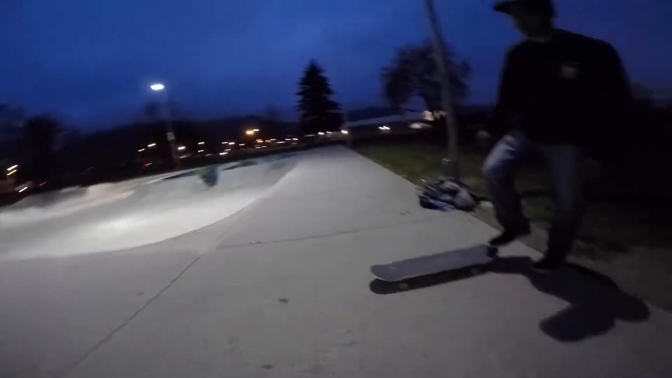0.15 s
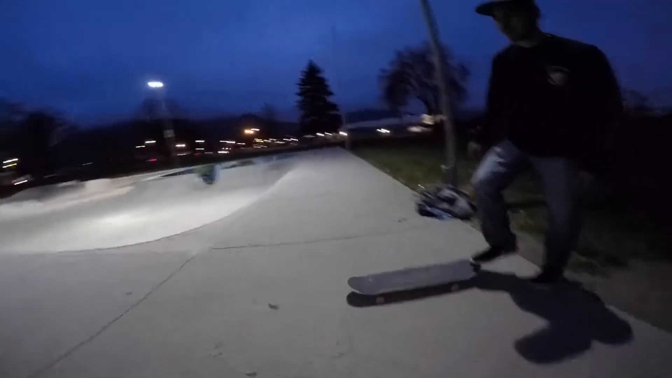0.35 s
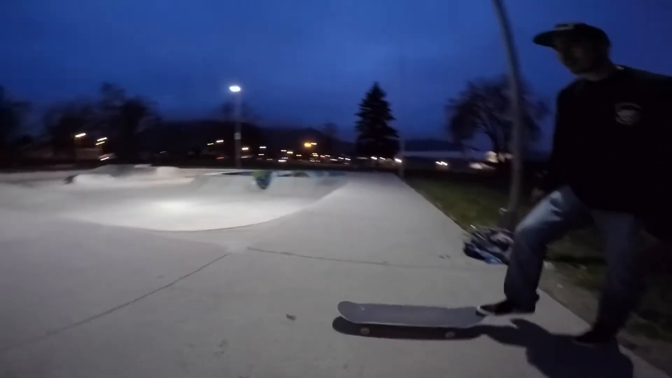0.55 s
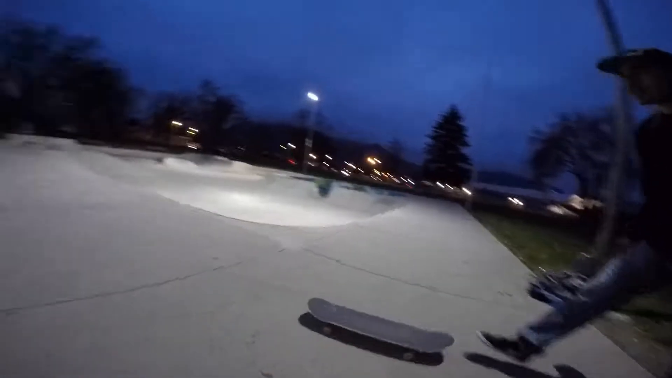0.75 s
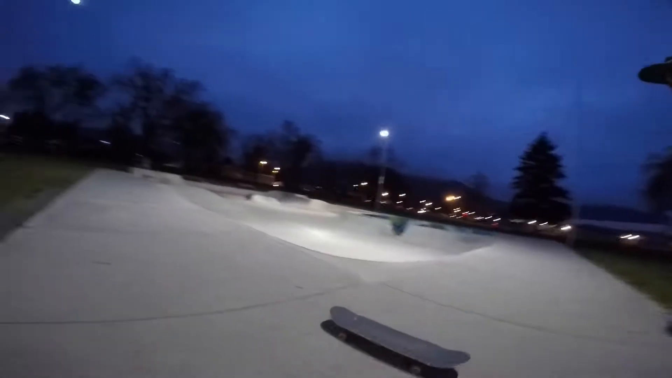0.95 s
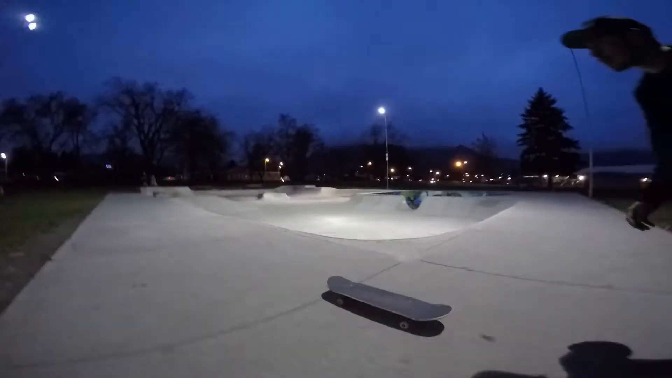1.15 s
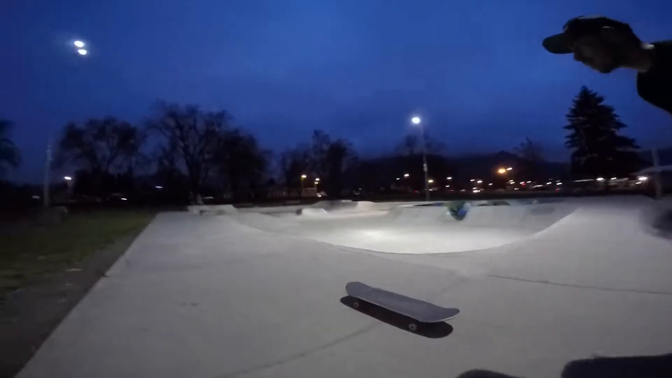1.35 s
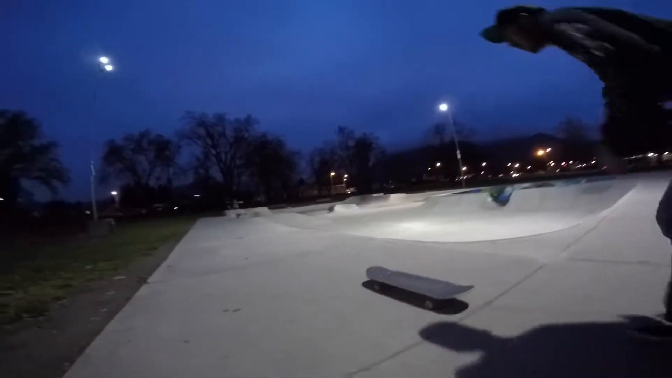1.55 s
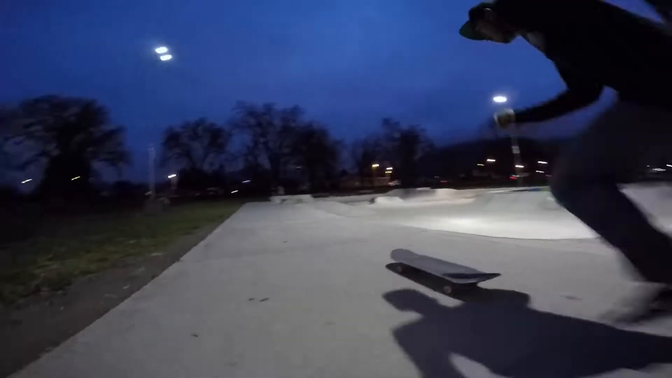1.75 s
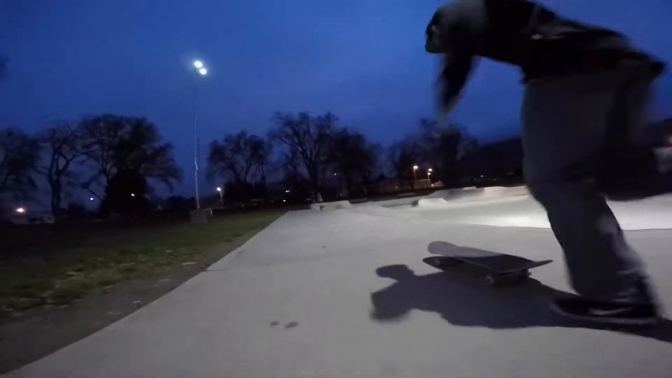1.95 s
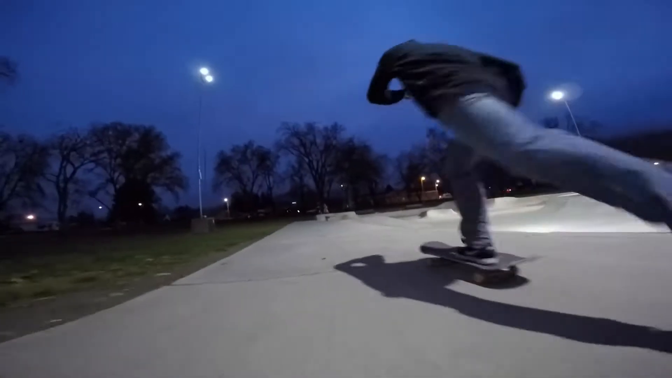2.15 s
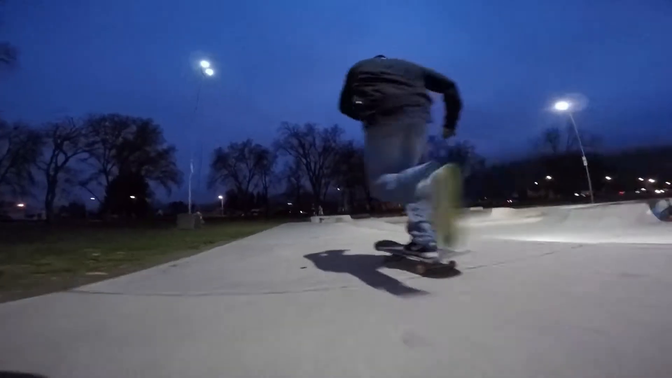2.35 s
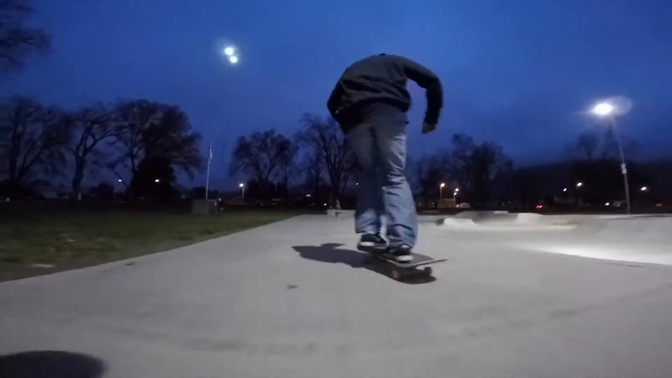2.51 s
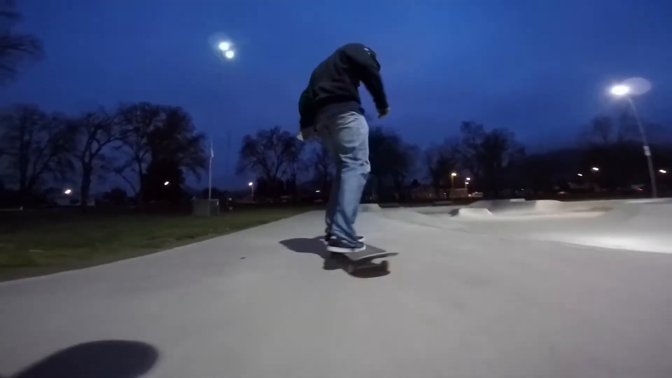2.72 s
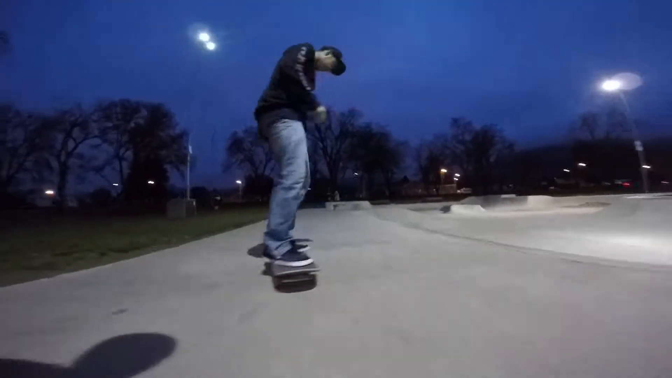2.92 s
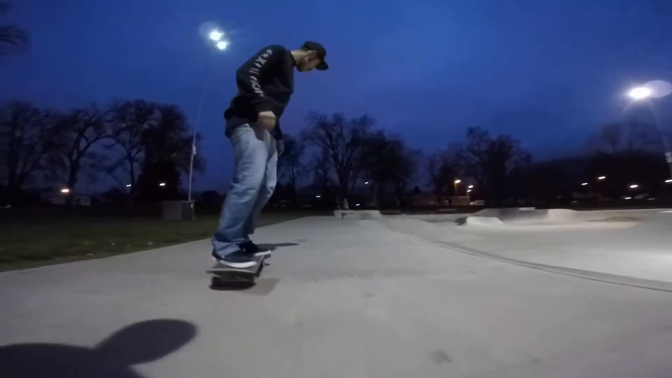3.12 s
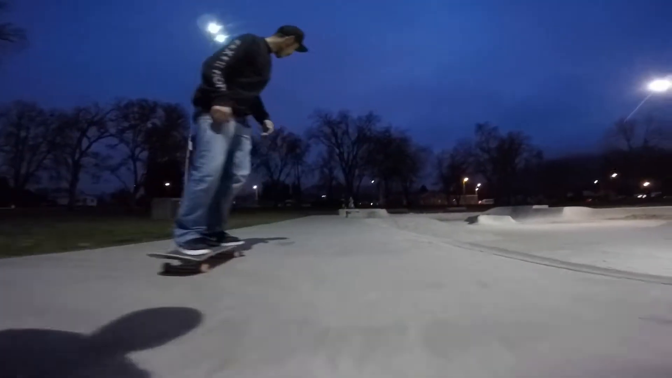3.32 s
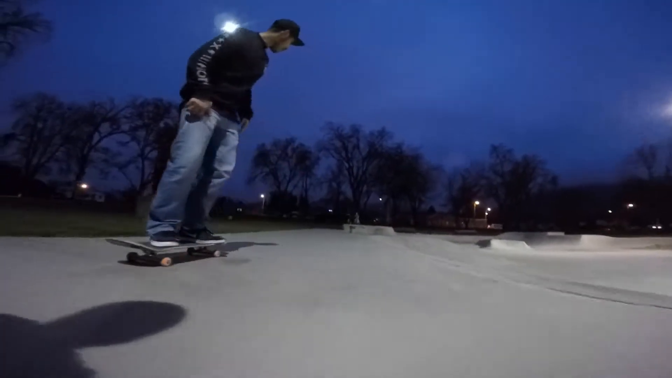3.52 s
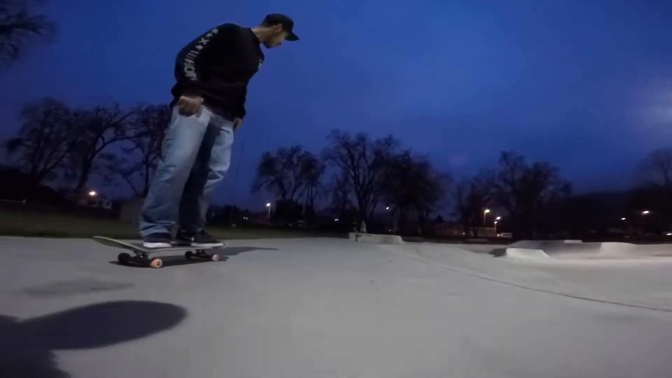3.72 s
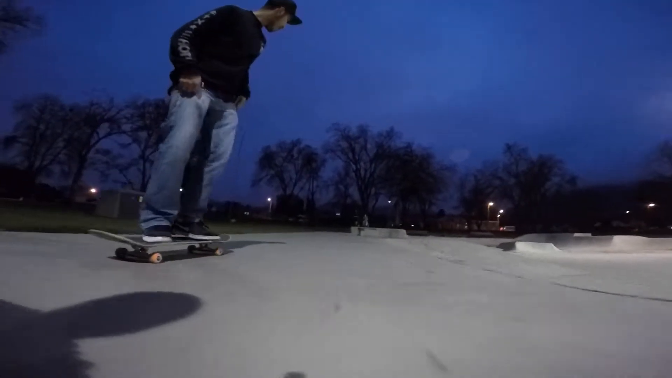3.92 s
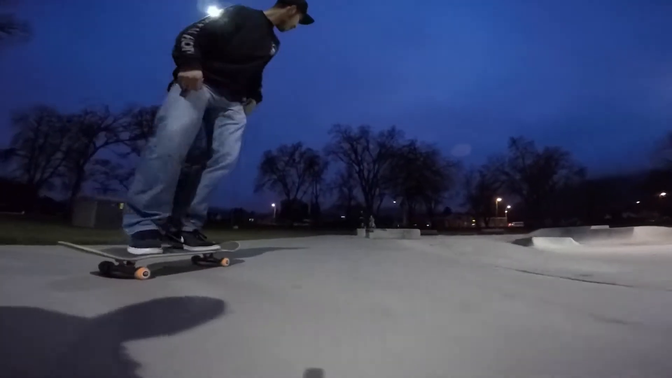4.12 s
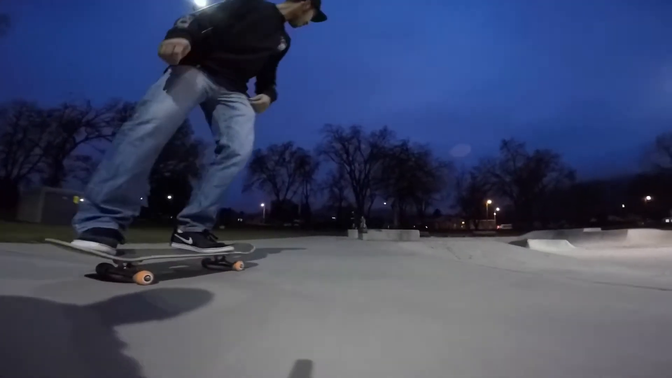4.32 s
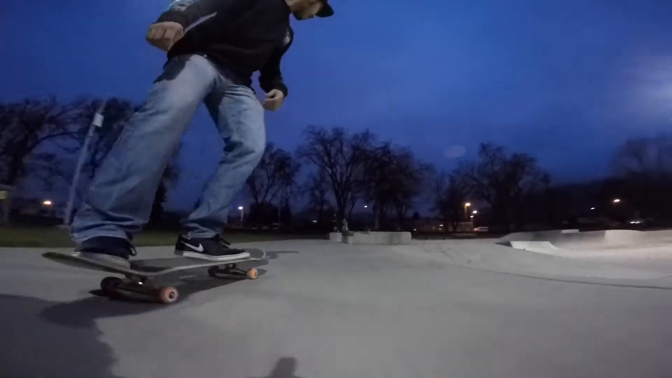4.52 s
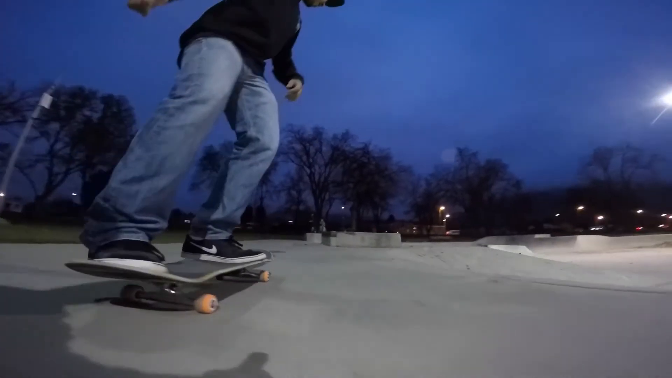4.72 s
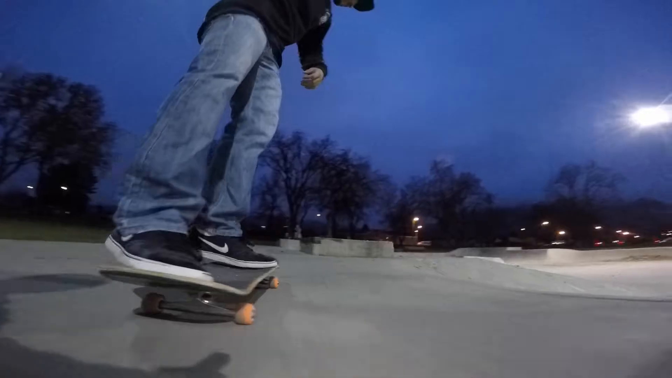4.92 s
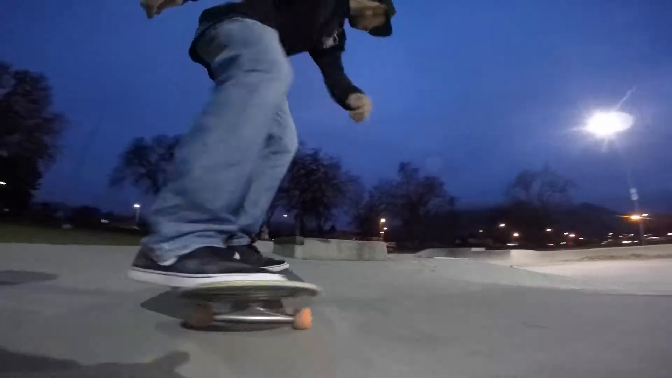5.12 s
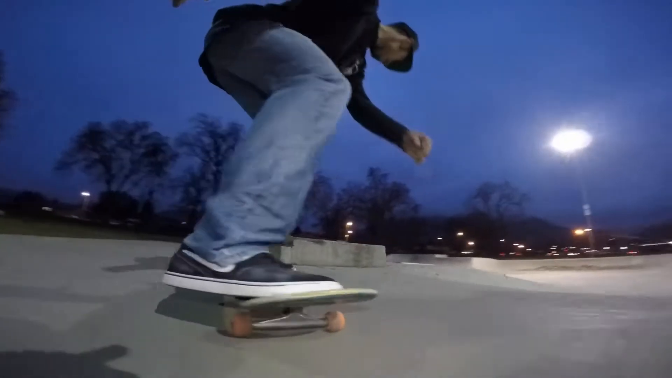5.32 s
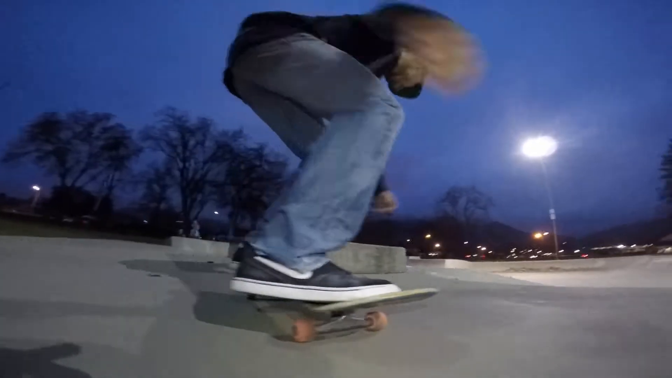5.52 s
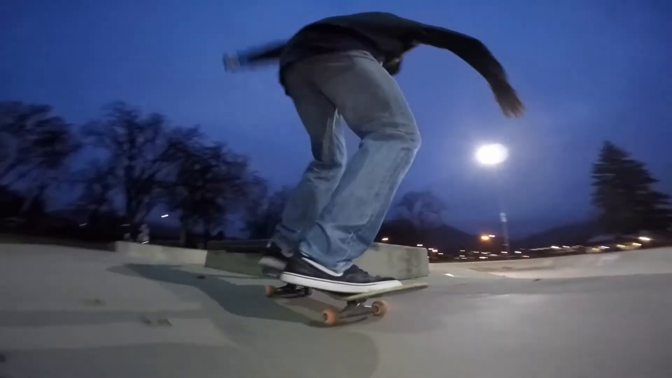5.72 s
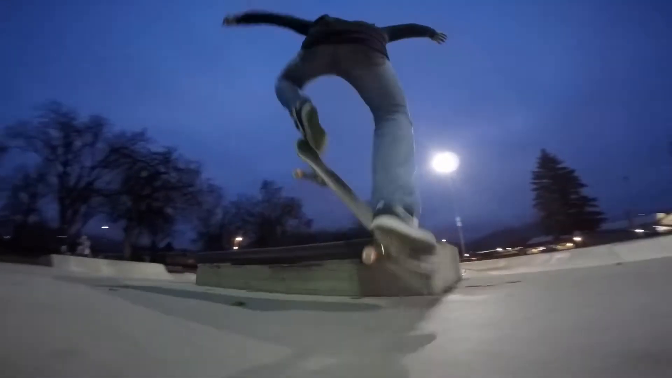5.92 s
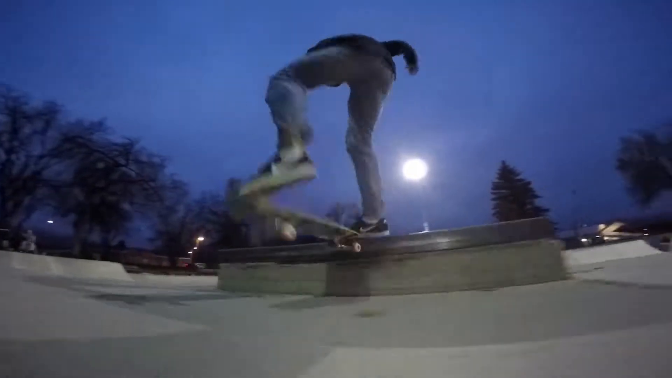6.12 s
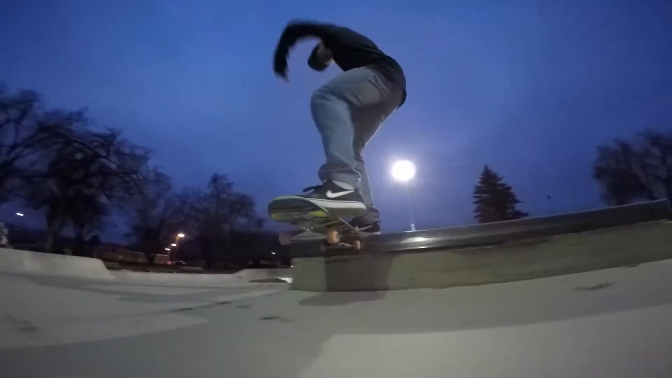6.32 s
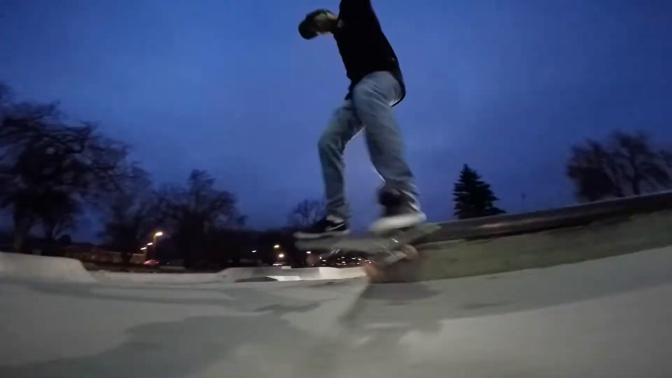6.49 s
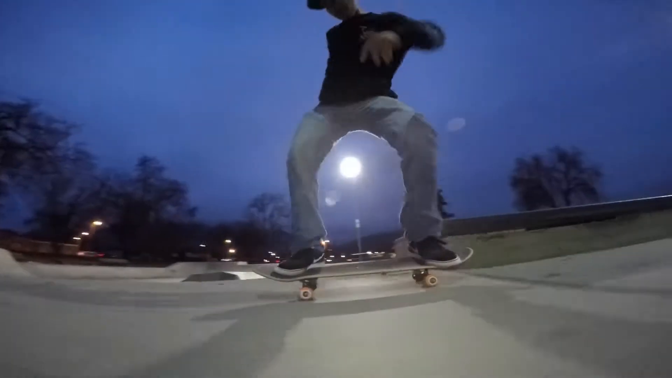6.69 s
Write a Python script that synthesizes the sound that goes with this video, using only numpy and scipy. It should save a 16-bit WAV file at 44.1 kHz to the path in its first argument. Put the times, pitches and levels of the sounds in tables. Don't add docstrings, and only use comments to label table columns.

```python
import sys
import numpy as np
from scipy import signal
from scipy.fft import rfft, irfft, next_fast_len
from scipy.io import wavfile
from scipy.ndimage import uniform_filter1d, map_coordinates

SR = 44100
rng = np.random.default_rng(int(sys.argv[2]) if len(sys.argv) > 2 else 0)


def gain_from_decibels(decibels):
    exponent = np.asarray(decibels, float) / 20
    return 10 ** exponent


def unload_audio(sound):
    columns = np.transpose(np.atleast_2d(sound))
    steps = np.round(np.clip(columns, -1, 1) * 32767)
    wavfile.write(sys.argv[1], SR, steps.astype(np.int16))


N = 297675
STILL_S = 0.27

# (centre [Hz], width [Hz], level [dB])
AXLES = [(3840, 300, 8), (4940, 1700, 0), (6400, 500, 3)]


def unit(x):
    return x / np.sqrt(np.mean(x ** 2) + 1e-20)


def along(points, hz):
    f, v = np.transpose(points)
    return np.interp(np.log(hz + 1), np.log(f + 1), v)


def curves(rows):
    s, *cols = np.transpose(rows)
    return [np.interp(np.arange(N) / SR, s, c) for c in cols]


def wobble(rate):
    knots = rng.standard_normal(int(N * rate / SR) + 4)
    return map_coordinates(knots, [np.arange(N) * rate / SR])


def filtered(x, response):
    m = next_fast_len(N + SR // 2)
    gain = response(np.fft.rfftfreq(m, 1 / SR))
    gain = gain / np.sqrt(np.mean(np.abs(gain) ** 2))
    return irfft(rfft(x, m) * gain, m)[:N]


def modes(x, table):
    def response(f):
        total = 0
        for k, (centre, width, db) in enumerate(table):
            damping = 1j * f * width
            total = total + (-1) ** k * gain_from_decibels(db) * damping / (centre ** 2 - f ** 2 + damping)
        return total
    return filtered(x, response)


def coloured(x, spectrum):
    return filtered(x, lambda hz: gain_from_decibels(along(spectrum, hz)))


def contacts():
    # (time [s], clack [dB], deck thud [dB], length [s])
    empty_strikes = [(.0257, 1, 2, 0.0013), (.030, -10.5, 6.5, 0.0022), (0.049, -24.5, -15, 0.0098),
                     (0.057, -21.5, 9, 0.0037), (.0783, -29, -7, 0.0047), (.1222, -25, 9, 0.0052),
                     (0.164, -24, 9, 0.0049), (0.1764, -28, -15, 0.0042), (0.192, -27.5, -15, 0.0078),
                     (0.211, -32.5, 6, 0.0061), (.2315, -43, 9, 0.0011), (0.262, -31, -11, 0.0084),
                     (0.517, -47, -2, 0.0019), (0.55, -44.5, -6, .0063), (.575, -42, -1, .003),
                     (.6079, -45, 13, 0.0081), (0.719, -31, -10, 0.0033), (0.741, -21, 7, 0.0048),
                     (0.773, -26.5, -16, 0.0044), (0.9254, -32, 3, 0.016), (1.0546, -25.5, -14, 0.0084),
                     (1.226, -25.5, -19, 0.0025), (1.297, -20, 0.5, 0.0095), (1.337, -25, 2, 0.005),
                     (1.526, -22, 1.5, 0.0078), (1.588, -26.5, -20, 0.0051), (1.623, -18.5, -1, 0.0016),
                     (1.8563, -30, -7, 0.0082), (1.9002, -26, -12, 0.0043), (1.9694, -23, 8, 0.0032),
                     (2.027, -30.5, -11, 0.013)]
    # (time [s], clack [dB], deck thud [dB], metal tick [dB], length [s])
    pebbles = [(0.64, -44, -14, 2, .002), (.66, -48, -9, 0, .002), (.805, -34, -6, 4, .002),
               (0.934, -34, -9, 4, .002), (.99, -36, -9, 2, 0.0022), (1.008, -32, -13, 5, .002),
               (1.36, -26, -9, -10, .003), (1.465, -26, -9, -9, 0.0016), (1.481, -35, -9, 1, .002),
               (1.561, -26, -7, -6, .003), (1.874, -33, -9, -4, .002), (2.051, -35, -9, 1, .002)]
    trick = [(2.168, -24.5, -2, 1, 0.006), (2.174, -21, -11, 0.5, 0.012), (5.8801, 0, -7, -7.5, 0.002),
             (5.883, -2, -11, -11, 0.0021), (5.928, -37, 6, -12, 0.019), (6.0825, -21.5, 1, -17, 0.0097),
             (6.1646, -4, -2.5, -4.5, 0.0035), (6.205, -26, 7.5, -17, 0.0086),
             (6.226, -24.5, 8, -15, 0.0038), (6.271, -30.5, 4.5, -15, 0.0053), (6.59, -38, 14, -2, 0.0013),
             (6.601, -15.5, 2.5, -28, 0.0052), (6.616, -23, 1, -13, 0.013),
             (6.626, -25, -33, -13.5, 0.0066), (6.6374, -13, -8, -9, 0.0041),
             (6.6508, -25.5, 16.5, -3, 0.0029), (6.659, -30, -3, -3, 0.0054),
             (6.6863, -17.5, -7.5, -8.5, 0.0048), (6.7, -17.5, -10, -15, 0.0035),
             (6.7116, -22, 1, -17, 0.0027), (6.7264, -15.5, -3, -18, 0.0041)]
    push = [(2.199, -22.5, 1.5, -10, 0.0056), (2.204, -23, -5, -12, .002), (2.289, -18, 8, -3, 0.0049),
            (2.295, -11.5, 4.5, -14, 0.0049), (2.303, -14.5, 2, -8, .004), (2.3125, -16.5, 4, -9, 0.0029),
            (2.321, -20, -5, -7, 0.0034), (2.3527, -18.5, -1, -12, .004), (2.358, -16.5, -1.5, -10, 0.0045),
            (2.365, -18, -4, -7, 0.0049), (2.393, -16, -11, -11, 0.0057), (2.402, -13, -12, -11, 0.0051),
            (2.41, -14.5, 7.5, -7.5, 0.0059), (2.420, -19.5, 2, -12, 0.0046), (2.44, -17, -1, -5, 0.0054),
            (2.445, -17, -9, -25, 0.0076), (2.481, -21.5, -10, -8.5, 0.0057), (2.5424, -22, 0, -12, 0.0044),
            (2.5756, -18, 7, -4, .005), (2.583, -17.5, -1, -8, 0.0034), (2.6268, -18.5, 7, -7, 0.0055),
            (2.659, -24, 7, -6, 0.0062), (2.667, -30, 9, -13, 0.0054), (2.726, -18.5, 4, -11, 0.0038),
            (2.7385, -19.5, -2, -10, 0.0042), (2.786, -24, 2, -10, .004), (2.806, -25.5, -10, 1, 0.0058),
            (2.847, -20.5, 9.5, -6, .004), (2.8778, -6.5, 4, -9.5, 0.0031),
            (2.884, -13.5, -1.5, -12, 0.0047), (2.892, -13, 1, -13, 0.0059), (2.904, -19.5, 2, -10, 0.0056),
            (2.938, -15, -10, -13, 0.0039), (2.948, -18, -10, -18, 0.0022), (2.9562, -9.5, 4.5, -9, 0.0034),
            (2.962, -5.5, 9, -22, 0.0036), (2.967, -7.5, -2, -20, 0.0028), (2.974, -12, 10, -12, .003),
            (2.982, -11, -11, -12, 0.0031), (3.021, -27, 0, -14, 0.0055)]
    joints = [(3.276, -29, 4, -16, 0.0095), (3.329, -18, 6, -19, 0.0038), (3.337, -20.5, 7.5, -13, 0.0068),
              (3.345, -22, 1.5, -8, 0.0052), (3.369, -23, -2, -15, 0.0018), (3.408, -29, 0, -7, 0.0032),
              (3.427, -15.5, 4.5, -13, 0.0034), (3.435, -10, 1.5, -18, 0.0038), (3.47, -21, -1, -5, 0.004),
              (3.496, -23, 5, -9, .003), (3.536, -15.5, -2, -13, 0.0062), (3.543, -24, 3, -19, 0.0046),
              (3.579, -23, -13, -4, 0.0037), (3.638, -18.5, -10, -17, 0.0012),
              (3.695, -24.5, -10, -15, 0.0048), (3.8792, -16.5, 5, -6, 0.005),
              (3.8903, -14, 3.5, -8, 0.0042), (3.896, -16, 11, -5, 0.0056), (3.903, -16.5, 1, -8.5, 0.0052),
              (3.9954, -16, 6.5, -14, 0.0074), (4, -14, 7.5, -7.5, 0.0032), (4.005, -15.5, 4, -1.5, .003),
              (4.2885, -11.5, 3.5, -13, 0.0042), (4.295, -22.5, 7, 0, 0.0035), (4.3, -18, 2, -4, 0.0022),
              (4.321, -28, 13.5, -16, 0.0034), (4.329, -23.5, 10, -3, 0.0035), (4.397, -17, 4, -11, 0.0036),
              (4.402, -20.5, 8.5, -6, 0.0039), (4.409, -24.5, 6, -3, 0.0035), (4.440, -21.5, 7, -9, .002),
              (4.449, -26.5, 8, -2.5, 0.0038)]
    seams = [(4.6817, -14, 7.5, -1.5, 0.0048), (4.691, -17.5, 6.5, -7.5, 0.0055),
             (4.701, -20, 3, -8, 0.0047), (4.745, -17, 10, -12, .003), (4.7526, -18, 11, 2, 0.0028),
             (4.761, -17.5, 5, -6, 0.0018), (4.798, -15, 5, -7, 0.0045), (4.803, -11, -4.5, -12, 0.0036),
             (4.808, -19.5, 3, -6, 0.0042), (4.868, -23.5, 21.5, -1, 0.0023), (4.8748, -13.5, 5, 0, 0.0036),
             (4.946, -27, -3, -14, .003), (5.0835, -15.5, 8, -3, 0.0048), (5.09, -14, 8.5, -8.5, 0.0051),
             (5.097, -20, -2, -7, .003), (5.196, -14.5, -4, -7, 0.0044), (5.2038, -16.5, 2, -6, 0.007),
             (5.221, -22.5, 17.5, 0, 0.0045), (5.404, -13.5, 7, -3, 0.0037),
             (5.412, -24.5, 12.5, -7, 0.0045), (5.42, -12.5, -1, -12, 0.0051),
             (5.5206, -9, 0.5, -18, 0.0057), (5.528, -12, 4, -7, 0.0043), (5.535, -16, -2.5, -8, 0.004)]
    s, db, thud_db, length = np.transpose(empty_strikes)
    tick_db = -9.5 + 0.35 * (db + 17.5) + 1.5 * (s > STILL_S)
    empty = np.c_[s, db, thud_db, tick_db, length]
    return np.vstack([empty, trick, push, joints, seams, pebbles])


def deck(force):
    # (time [s], load on the deck [0-1])
    rider_on = [
        (0, 0.04),
        (2.1, 0),
        (2.2, 1),
        (5.88, 0.48),
        (5.95, 0.63),
        (6.55, 0.09),
        (6.6, 0.95),
        (6.75, 0.85),
    ]
    # (centre [Hz], width [Hz], level [dB])
    free_deck = [(248, 150, -28), (365.7, 61, 1), (524, 76, -2), (735, 250, -10), (1140, 170, -9.5)]
    # (centre [Hz], width [Hz], level [dB])
    loaded_deck = [(161, 107, -2.5), (296, 143, 3), (405, 144.6, 5), (572.7, 159, -1.5), (798, 171, -6.5),
                   (1183, 160, -8)]
    load = np.clip(curves(rider_on)[0], 0, 1)
    free = gain_from_decibels(-6.5) * modes(force * np.sqrt(1 - load), free_deck)
    loaded = modes(force * np.sqrt(load), loaded_deck)
    return filtered(free + loaded, lambda hz: 1 / (1 + 1j * hz / 1100) ** 2)


def clatter():
    # (centre [Hz], width [Hz], level [dB])
    wheel_modes = [(955, 197, -9), (1540, 476, -3.5), (2160, 363, 4), (2537, 474, 1), (2974, 368, -3.5)]
    # (frequency [Hz], density [dB per Hz])
    tick_spectrum = [(2200, -22), (3400, 3.5), (4300, 0.5), (5600, -3), (7400, -18.5), (10600, -17),
                     (15400, -34)]
    force = np.zeros((3, N + 2048))
    t = np.arange(-512, 1536) / SR
    strikes = contacts()
    noise = rng.standard_normal((len(strikes), 3, len(t)))
    noise = noise * np.abs(noise) ** 0.052
    since = strikes[:, :1] - strikes[:, 0]
    rests = np.where(since > 0, since, 1).min(axis=1)
    for (s, db, thud_db, tick_db, length), shake, rest in zip(strikes, noise, rests):
        sharp = np.where(rest > .015, .12, .3) * gain_from_decibels(-.2 * (db + 12))
        span = np.clip(length, .0005, .015) * np.where(t < 0, sharp, .9)
        spans = span * np.array([[1], [.85], [.8]])
        shape = np.exp(-np.abs(t / spans) ** np.where(t < 0, 1.1, 1.3))
        level = gain_from_decibels(db + np.array([[3], [thud_db - 7.5], [tick_db + 1]]))
        start = round(s * SR)
        force[:, start:start + len(t)] += level * shape * shake
    clack, thud, tick = force[:, 512:N + 512]
    seconds = np.arange(N) / SR
    bouncing = np.abs(seconds - .24) < .2
    metal = coloured(tick * np.where(bouncing, .05, 1), tick_spectrum)
    metal = metal + 0.24 * modes(modes(tick * bouncing, AXLES), AXLES)
    slap = 1.74 * modes(tick * (seconds > 5.8), [(3940, 340, 0)])
    return modes(clack, wheel_modes) + deck(thud) + metal + slap


def park(x):
    # (frequency [Hz], decay time t60 [s])
    decay = [(200, 0.17), (2200, 0.1), (5000, 0.038), (8000, 0.02), (14000, 0.013)]
    hz, t, z = signal.stft(rng.standard_normal(SR // 2), SR, nperseg=256)
    fading = gain_from_decibels(-60 * t / along(decay, hz)[:, None])
    tail = signal.istft(z * fading, SR, nperseg=256)[1]
    late = np.pad(x, (200, 0))
    return signal.fftconvolve(late, tail / np.linalg.norm(tail))[:N]


def grit(rate, spread_db, smooth):
    struck = rng.random(N) < rate / SR
    size_db = spread_db * np.minimum(rng.exponential(size=N), 3.5)
    grains = struck * rng.standard_normal(N) * gain_from_decibels(size_db)
    return unit(unit(grains) + smooth * rng.standard_normal(N))


def patchy(x, depth_db):
    z = signal.stft(x, nperseg=512)[2]
    field = uniform_filter1d(rng.standard_normal(z.shape), size=6, axis=0)
    field = uniform_filter1d(field, size=10, axis=1)
    return unit(signal.istft(z * gain_from_decibels(depth_db * unit(field)), nperseg=512)[1][:N])


def shivering():
    t = np.arange(N) / SR
    decay = gain_from_decibels(-24.5 - 110 * (t - 0.04))
    stopping = np.clip((STILL_S + 0.038 - t) / 0.033, 0, 1) ** 2
    return decay * (t > 0.025) * stopping


def rolling(blows):
    # (time [s], roll strength [dB], weight pressing the wheels [0-1])
    roll_points = [(0, -53.5, 0.94), (.34, -61.5, 0.4), (.55, -55, 0.5), (.75, -36.5, 0.26), (1, -34, 0.21),
                   (1.6, -32.5, 0), (2.12, -36.5, 0.12), (2.2, -31.5, 0.68), (2.5, -27.5, 0.75),
                   (2.82, -20.5, 0.41), (3.06, -36.5, 0.94), (3.25, -30.5, 0.96), (3.8, -30.5, 0.83),
                   (4.2, -35, 0.82), (4.95, -32, 0.8), (5.85, -29.5, 0.82), (5.91, -38, 0.67),
                   (6.75, -41, 0.91)]
    # (time [s], wheel speed seen by the microphone [0-1])
    speed_points = [(1, 0), (2.1, 0.33), (2.8, 0.53), (3.05, 0), (3.3, 0), (3.7, 0.6), (4.7, 0.97),
                    (5.4, 0.97), (5.85, 0.4), (5.92, 0.52), (6.75, 0.5)]
    # (centre [Hz], width [Hz], level [dB])
    free_wheels = [(1840, 1190, -2.5), (2430, 594, 3.5), (3970, 680, -17.5)]
    # (centre [Hz], width [Hz], level [dB])
    pressed_wheels = [(1160, 380, -6.5), (1580, 380, 0.5), (2150, 570, 1.5), (2990, 810, -5)]
    # (frequency [Hz], density [dB per Hz])
    truck_spectrum = [(1900, -67), (3300, -0.5), (3750, 4), (4790, -0.5), (5320, -4.5), (6030, -6),
                      (6900, -14), (8600, -20), (9400, -17), (10000, -16), (11000, -26), (12400, -24),
                      (14700, -20), (15500, -22)]
    # (centre [Hz], width [Hz], level [dB])
    race_modes = [(9350, 1000, -2), (10900, 1700, 0)]
    # (time [s], level over the wheels [dB])
    sing_points = [(0.6, -1), (.8, -2.5), (1.2, -12.5), (2.1, -15.5), (2.6, -20), (2.82, 7.5), (2.95, -7),
                   (6.75, -28)]
    t = np.arange(N) / SR
    roll_db, weight = curves(roll_points)
    speed, = curves(speed_points)
    shiver = shivering()

    skip_db, skip_s, skip_depth = -21.5, 0.2, 0.26
    keep = np.exp(-1 / (skip_s * SR))
    jolt = signal.lfilter([1 - keep], [1, -keep], blows ** 2)
    roll = gain_from_decibels(roll_db) * (1 + jolt / gain_from_decibels(2 * skip_db)) ** -skip_depth

    bumps = 0.96 * wobble(30) + 1.44 * wobble(70)
    ground = deck(grit(600, spread_db=0.5, smooth=1.55))
    ground = ground / np.sqrt(np.abs(uniform_filter1d(ground ** 2, size=SR // 3)))
    fine = patchy(grit(1200, spread_db=3, smooth=1.66), depth_db=2)

    empty = np.interp(t, [2.1, 2.2, 5.88, 5.92, 6.56, 6.6], [1, 0, 0, .5, .5, 0])
    wheels = modes(fine * np.sqrt(empty), free_wheels)
    wheels = wheels + modes(fine * np.sqrt(1 - empty), pressed_wheels)
    whirr = (roll + shiver) * gain_from_decibels(bumps + 1.05 * wobble(13)) * wheels

    bearings = unit(coloured(fine + 1.25 * rng.standard_normal(N), truck_spectrum))
    hiss_level = roll * gain_from_decibels(-18 + 7.5 * weight + 7 * speed) + gain_from_decibels(-38) * shiver
    hiss = hiss_level * gain_from_decibels(1.26 * bumps + 1.36 * wobble(4.5)) * bearings

    rumble_level = roll * gain_from_decibels(-8 + 19.5 * weight) + gain_from_decibels(-0.5) * shiver
    rumble = rumble_level * gain_from_decibels(bumps + 0.52 * wobble(5.4)) * ground

    race_level = roll * gain_from_decibels(-43.5 + 13.5 * speed) * (1 - empty)
    races = race_level * modes(modes(fine, race_modes), race_modes)

    hum_level = roll * gain_from_decibels(curves(sing_points)[0]) + gain_from_decibels(-2) * shiver
    hum = hum_level * modes(rng.standard_normal(N), [(372, 26, 0)])
    jingle = gain_from_decibels(-29) * shiver * modes(modes(fine, AXLES), AXLES)
    return rumble + whirr + hiss + races + hum + jingle


def lamps():
    # (time [s], level [dB])
    hum_points = [(0, -52), (.45, -53), (.9, -40.5), (1.4, -37.5), (2.1, -54), (6.75, -40.5)]
    turns = np.cumsum(242 + 1.57 * wobble(8.1)) / SR
    return gain_from_decibels(curves(hum_points)[0] - 0.5 + 2.7 * wobble(26)) * np.sin(2 * np.pi * turns)


def wind():
    # (time [s], strength [dB])
    strength = [(0, -44), (.3, -46.5), (.7, -41), (1, -27.5), (1.5, -21.5), (2.05, -23.5), (2.34, -16.5),
                (2.55, -22), (2.75, -11.5), (3.2, -30), (3.9, -20), (4.1, -28.5), (4.64, -22.5),
                (5.06, -29), (5.4, -12), (5.86, -16), (5.93, -18.5), (6.35, -31.5)]
    # (frequency [Hz], density [dB per Hz])
    air_spectrum = [(12, -43), (20, -0.5), (38, 3.5), (160, -8), (195, -17), (260, -15), (340, -24.5),
                    (570, -120)]
    lumps = gain_from_decibels(0.88 * wobble(12) + 1.65 * wobble(25))
    push = unit(coloured(lumps * rng.standard_normal(N), air_spectrum))
    return gain_from_decibels(curves(strength)[0] + 1.5 * wobble(3.98)) * 2.9 * np.tanh(push / 2.9)


def town():
    # (frequency [Hz], density [dB per Hz])
    traffic_spectrum = [(300, -19), (1200, -7), (2300, 2), (4500, -12), (7000, -28), (15000, -38)]
    return gain_from_decibels(-63) * coloured(rng.standard_normal(N), traffic_spectrum)


def grind():
    # (time [s], level [dB])
    scrape = [
        (6.2, -60),
        (6.235, -35),
        (6.285, -34),
        (6.33, -42),
        (6.36, -50),
        (6.39, -43),
        (6.43, -56),
        (6.47, -68),
    ]
    # (centre [Hz], width [Hz], level [dB])
    ledge_modes = [(930, 130, -8), (1200, 60, 4), (1365, 65, 0), (1960, 200, -7), (3000, 260, -11)]
    slips = gain_from_decibels(2.5 * wobble(50)) * grit(600, spread_db=6, smooth=0.66)
    return modes(gain_from_decibels(curves(scrape)[0]) * slips, ledge_modes)


def scene():
    blows = clatter() + grind()
    board = blows + gain_from_decibels(-21) * park(blows) + rolling(blows)
    return (board + lamps() + wind() + town())[None]


def band_limit(x):
    return signal.sosfilt(signal.butter(12, 16610, fs=SR, output="sos"), x)


def record(dry):
    top_hz = 15400
    m = next_fast_len(N)
    edge = np.interp(np.fft.rfftfreq(m, 1 / SR), [top_hz - 150, top_hz + 100], [1, 0])
    x = irfft(rfft(dry, m) * edge, m)[:, :N]
    x = x / (1 + np.abs(x / .97) ** 6) ** (1 / 6)
    return band_limit(x)


dry = scene()
out = record(dry)
unload_audio(out)
```